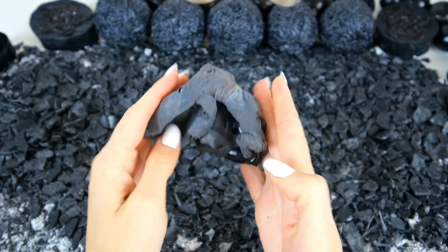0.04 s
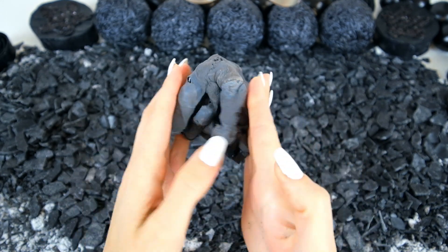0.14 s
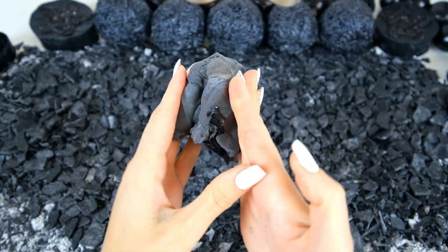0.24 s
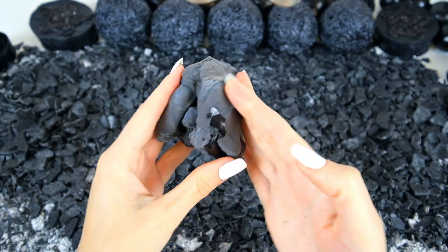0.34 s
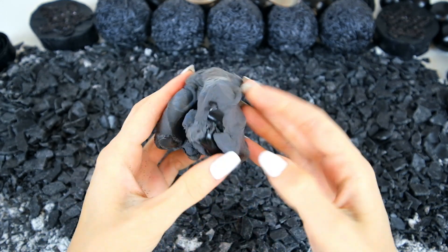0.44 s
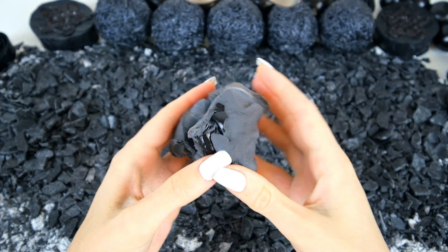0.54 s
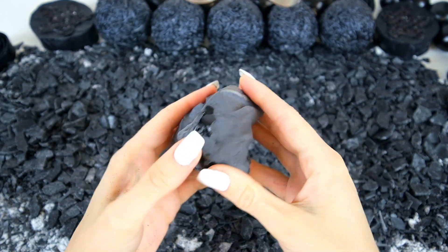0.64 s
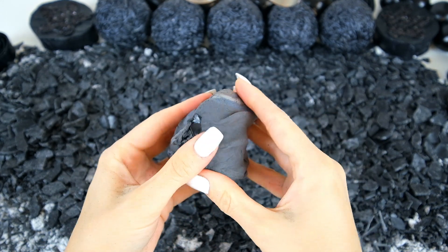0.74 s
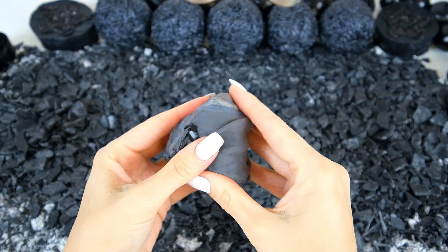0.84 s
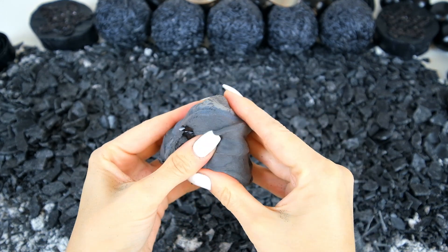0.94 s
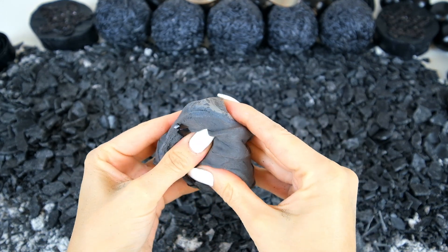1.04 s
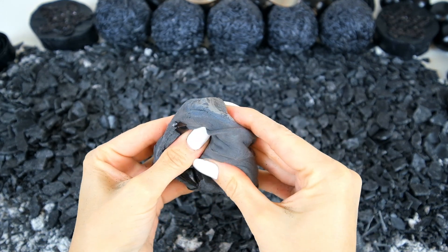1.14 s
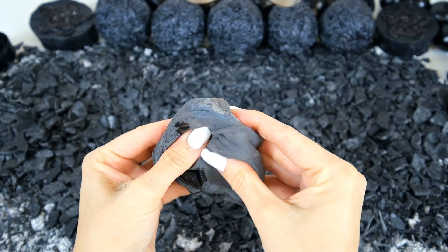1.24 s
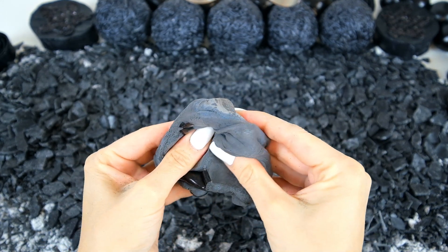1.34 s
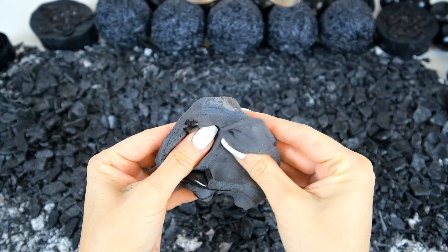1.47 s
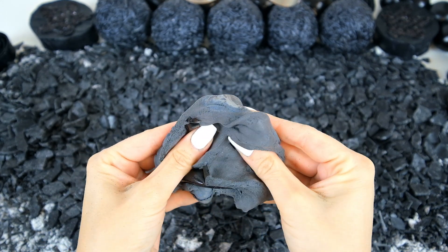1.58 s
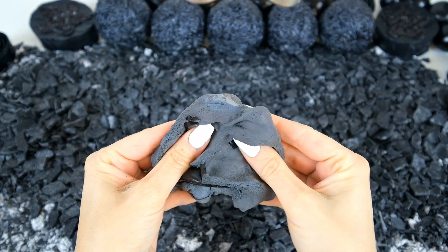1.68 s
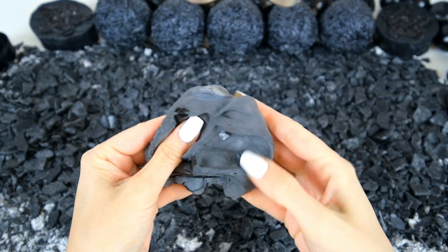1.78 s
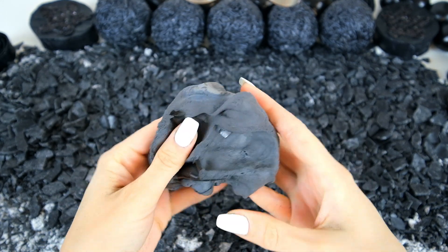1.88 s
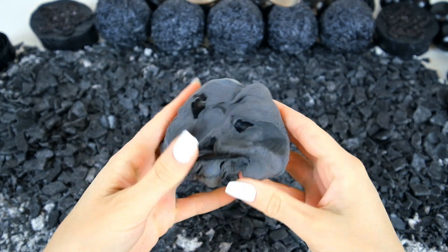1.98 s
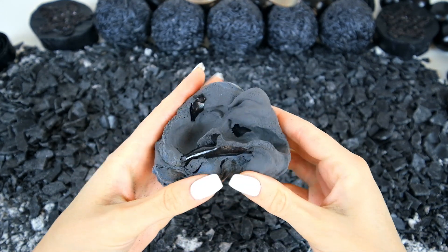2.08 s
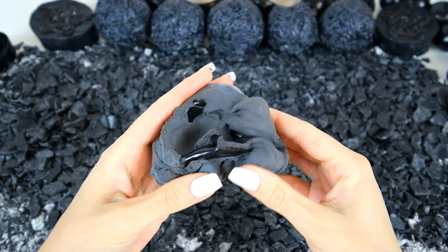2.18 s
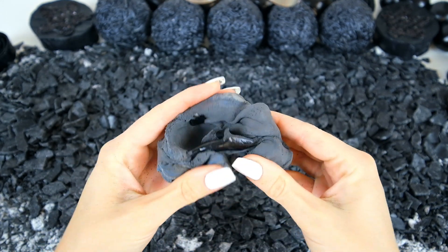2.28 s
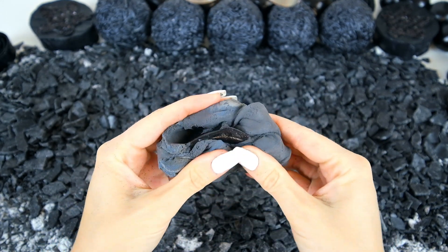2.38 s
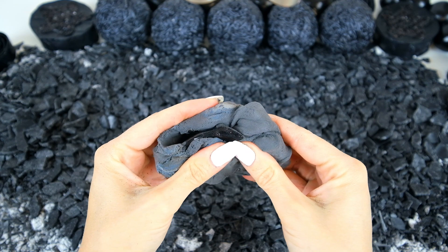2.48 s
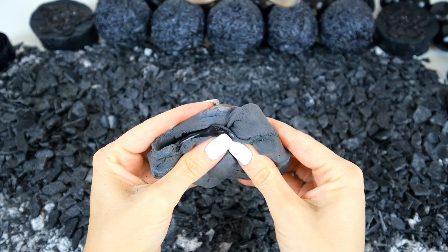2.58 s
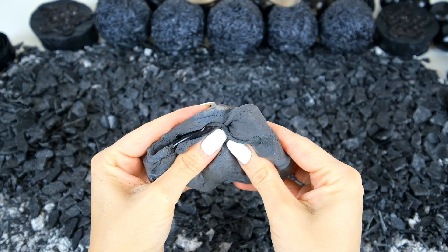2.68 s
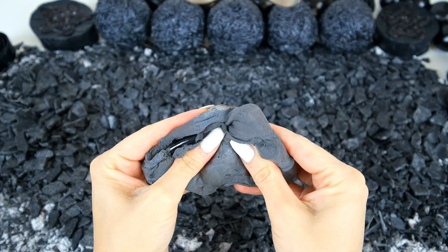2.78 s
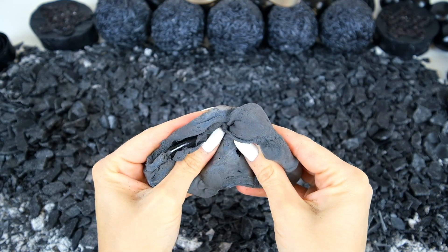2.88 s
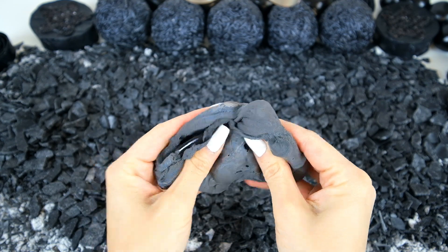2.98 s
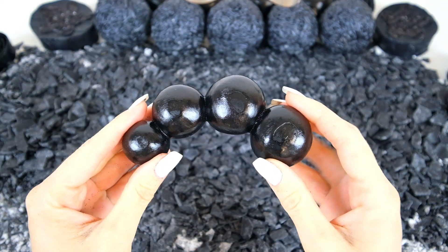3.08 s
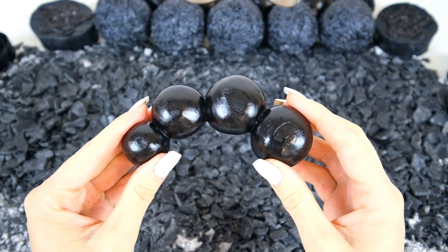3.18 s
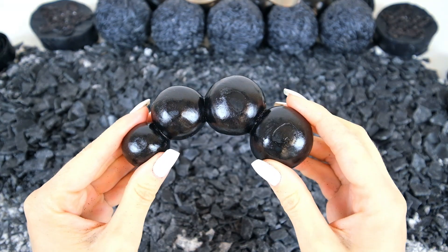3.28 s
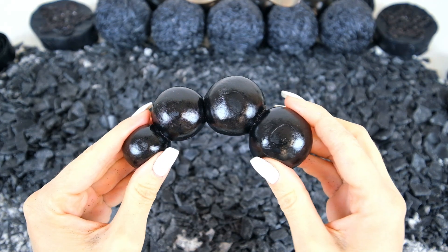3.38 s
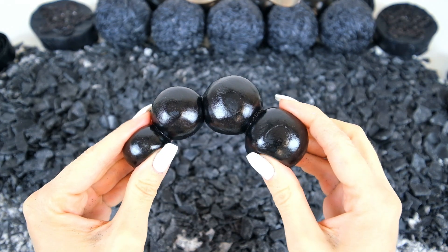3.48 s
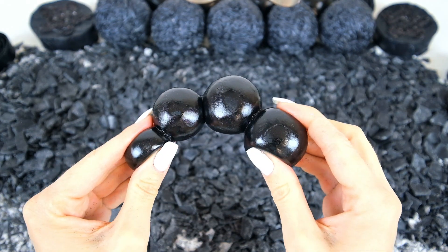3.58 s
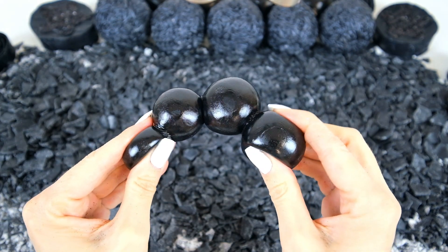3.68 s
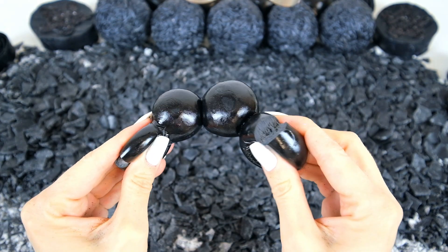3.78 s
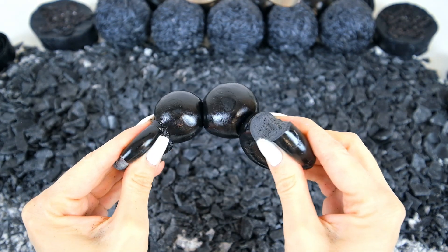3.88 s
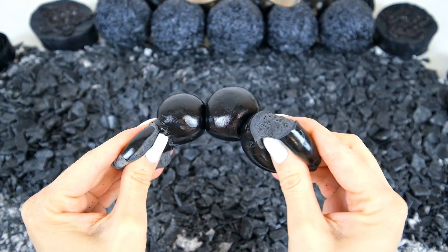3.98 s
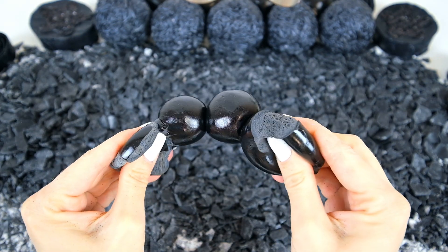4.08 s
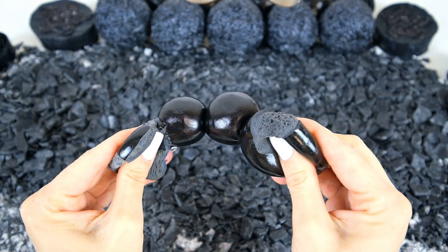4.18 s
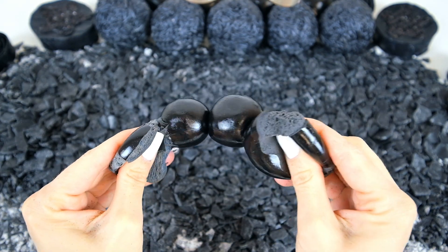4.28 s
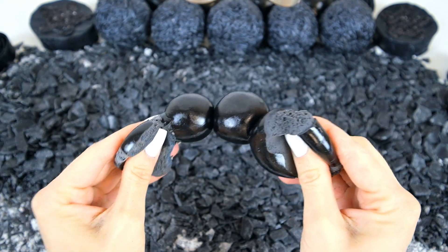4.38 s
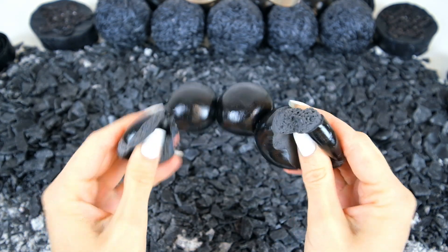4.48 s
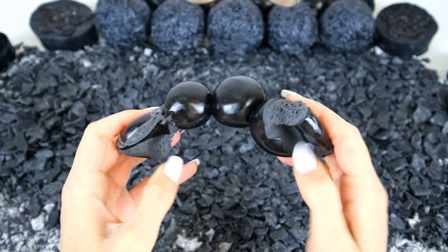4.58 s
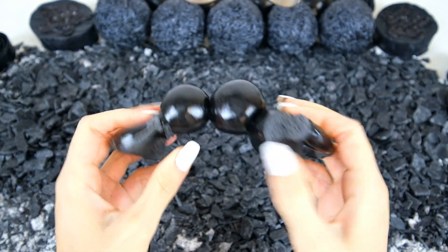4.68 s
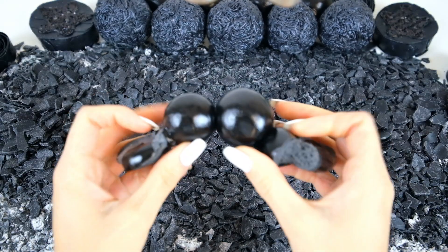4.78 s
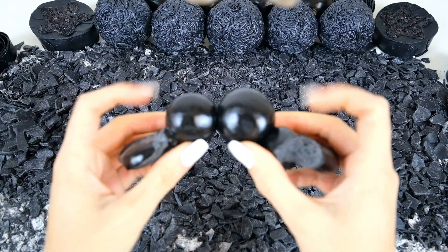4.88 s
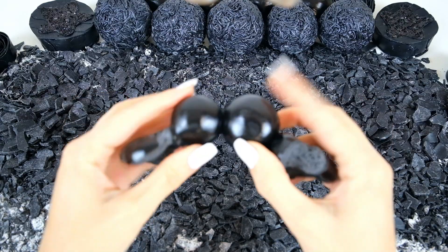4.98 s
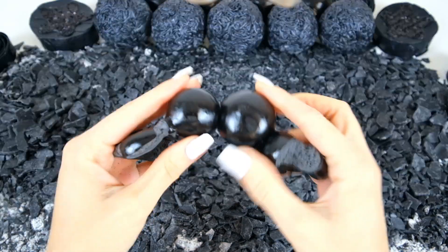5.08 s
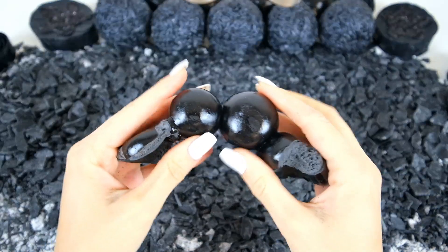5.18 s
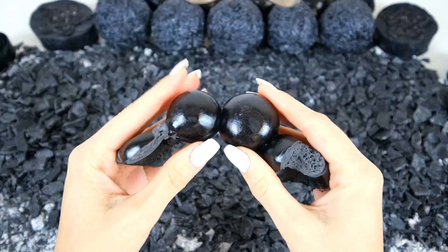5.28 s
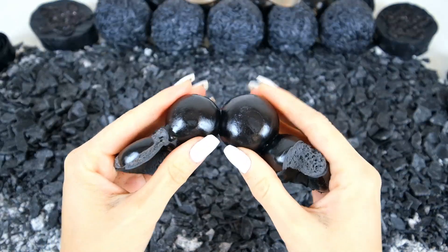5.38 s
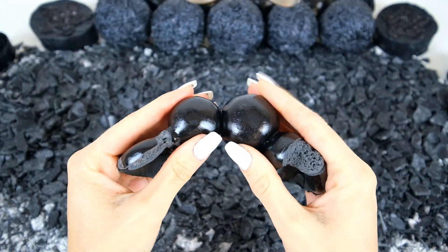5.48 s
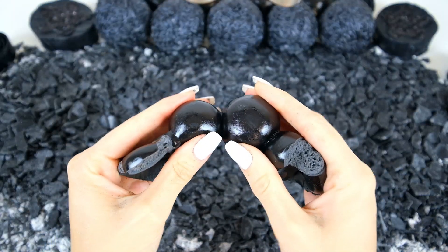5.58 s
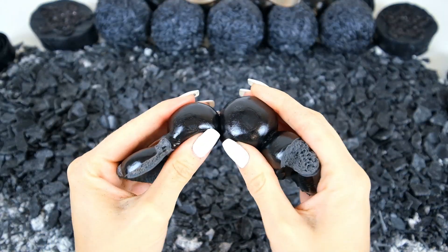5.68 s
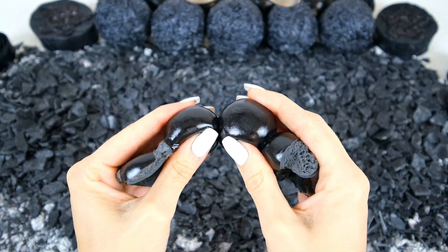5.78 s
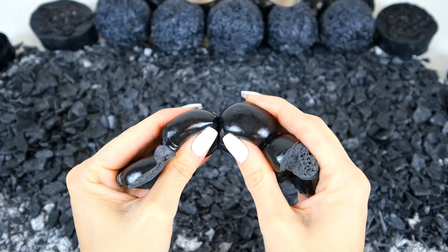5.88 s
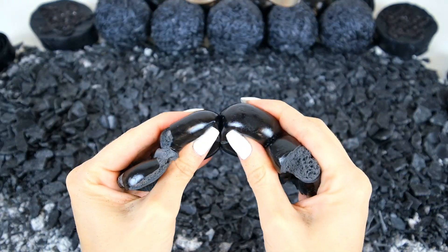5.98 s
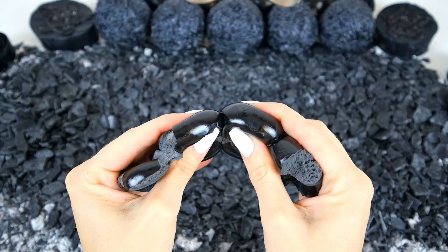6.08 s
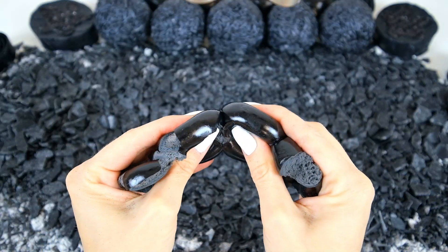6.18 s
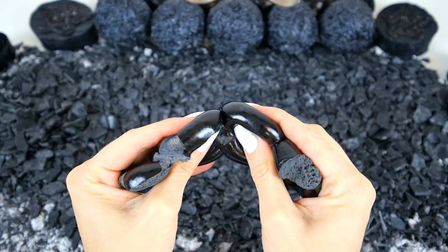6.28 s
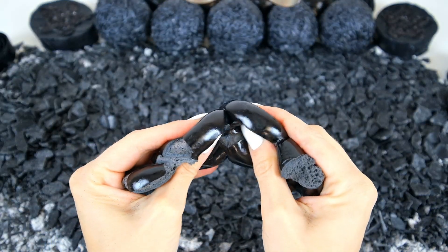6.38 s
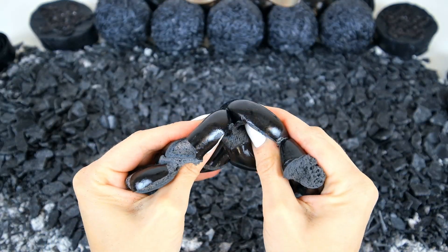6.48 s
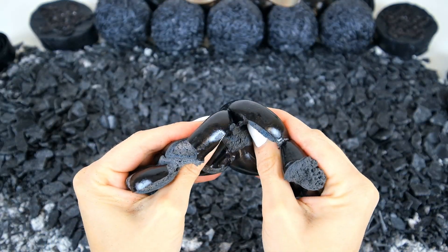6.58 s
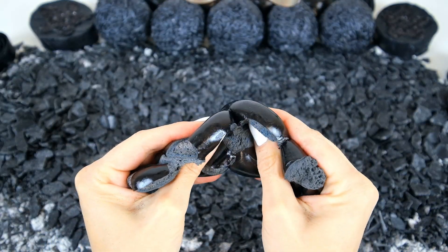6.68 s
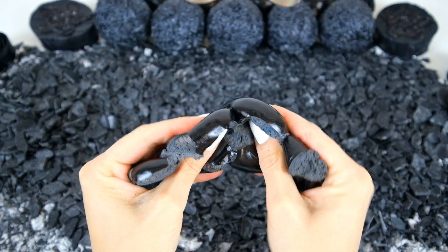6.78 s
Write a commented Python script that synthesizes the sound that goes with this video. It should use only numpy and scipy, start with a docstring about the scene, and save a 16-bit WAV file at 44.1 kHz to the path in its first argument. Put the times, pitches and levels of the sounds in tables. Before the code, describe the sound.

Dry, brittle crunching by hand in a quiet room, heard intimately in wide stereo. Foam clay crackles and fizzes in uneven bursts, with muffled bumps as fingers shift it. Then hard glossy shells are crushed: loud crisp cracks with low pops and brighter fizz, a thumping pause while the grip changes, and a second heavy run of snaps thinning out at the close.

```python
"""Two hands squeeze foam clay with a brittle dried skin, close to a pair of microphones.
From the start the skin snaps in short bursts of noise and the foam under it fizzes in tiny ticks.
The moving hands rub the clay and send low, damped thumps through the table.
From 3.3 s on they crush hollow glazed balls: snaps gain a low swing, the fizz is brighter, rumble joins in.
Shaped noise makes rumble and room hiss throughout; the loudest snaps overload the recorder."""
import sys
import numpy as np
from scipy import signal
from scipy.fft import rfft, irfft
from scipy.io import wavfile
from scipy.ndimage import uniform_filter1d

SR = 44100
rng = np.random.default_rng(int(sys.argv[2]) if len(sys.argv) > 2 else 0)


def pcm_store(signal):
    """Save signal as 16-bit PCM."""
    levels = np.round(np.clip(np.atleast_2d(signal), -1, 1) * 32767)
    wavfile.write(sys.argv[1], SR, levels.astype(np.int16).T)


N = 301644
HOLLOW_S = 3.3  # from here on the hands crush hollow glazed balls

# Thumps from the hands. Each row: peak time in seconds, rough peak level in dB, pitch in Hz.
THUMP_ROWS = [(0.068, -32, 79.0), (0.128, -29.5, 63.6), (0.203, -32, 52), (0.338, -18, 69.6),
              (0.412, -21.5, 77), (0.557, -18, 58.3), (0.593, -19, 70), (0.691, -22.5, 92),
              (0.739, -31, 49.0), (1.116, -33, 165), (1.786, -18.5, 109), (1.814, -22.5, 86.5),
              (1.853, -22, 84), (1.879, -17.5, 100), (1.983, -15, 67), (2.005, -22.5, 100),
              (2.098, -24.5, 76.0), (2.117, -19.5, 72.5), (2.163, -28, 54), (2.195, -22, 94),
              (2.26, -31.5, 53.5), (2.683, -29, 140), (2.808, -38.5, 39.3), (2.87, -42, 39.7),
              (3.026, -28, 146), (3.081, -34.5, 92), (3.168, -24, 71.0), (3.46, -40, 50.3),
              (3.646, -27, 122.0), (3.856, -35, 76), (4.466, -22, 89), (4.514, -9, 105), (4.558, -35, 60.6),
              (4.585, -20.5, 93), (4.652, -25, 68.0), (4.675, -24, 86.0), (4.7, -27, 91.0),
              (4.719, -20, 71), (4.769, -23.5, 54.4), (4.795, -17, 99), (4.86, -33, 111.0),
              (4.913, -28, 70.6), (4.931, -16, 99), (4.956, -15.5, 92.0), (4.994, -10, 82),
              (5.077, -18, 91.5), (5.093, -17, 87.5), (5.168, -20.5, 96.6), (5.391, -17, 89.5),
              (5.473, -24.5, 74), (6.823, -27, 79)]
# Pressure on the foam. Each row: time in seconds, relative fizz level in dB,
# body under 2 kHz in dB relative to the middle band.
SQUEEZE_ROWS = [(0, -43.5, -3), (.23, -52, -21), (.5, -58, -2), (.72, -53, -9.5), (.94, -46, -13.5),
                (1.05, -45.5, -3), (1.22, -45, -8.5), (1.63, -53, -12.5), (1.9, -51.5, -6),
                (2.03, -58, -14), (2.12, -52, -18), (2.29, -44, -46), (2.48, -44.5, -11), (2.66, -45.5, -9),
                (2.69, -37, -1), (2.89, -56.5, -10), (3.08, -50.5, -13), (3.11, -62, -15),
                (3.28, -78.5, -9.5), (3.41, -59.5, -25), (3.53, -54.5, -10), (3.545, -31, -6),
                (3.67, -36, -17), (3.71, -23, -4), (4.07, -41, -8.5), (4.17, -41, -8), (4.33, -53.5, -9.5),
                (4.84, -52, -5), (5.23, -55.5, -15), (5.29, -63.5, -21), (5.46, -56.5, -34),
                (5.645, -51.5, -14.5), (5.67, -38, -3), (5.84, -26.5, -11.5), (6.21, -46.5, -2.5),
                (6.3, -39.5, -13), (6.32, -19.5, -6.5), (6.51, -44, -3), (6.6, -39.5, -5),
                (6.72, -52.5, -15), (6.83, -31.5, -3.5)]


def snaps():
    """Each crack runs in a few uneven jumps, then the freed foam fizzes; later snaps add a low swing."""
    # The clear snaps of the skin. Each row: start in seconds, level in dB,
    # body under 2 kHz and edge over 7 kHz, both in dB relative to the middle band.
    snap_rows = [(0.0569, -16.5, -7.5, 8.5), (0.1406, -27.5, -17, -1.5), (0.593, -22, -3.5, 13.5),
                 (.7661, -28.5, -11, 11), (0.8244, -17.5, -25, -1.5), (.9713, -15, -1, -12),
                 (1.033, -18, 2.5, -4), (1.0467, -7, -6, 0), (1.088, -12, -1, 5.5), (1.1071, -12, -2, -1),
                 (1.1488, -22, -4, -8), (1.1764, -13.5, -7, -6), (1.196, -31.5, -5, -3),
                 (1.2638, -19, -6, -1), (1.3352, -33, -12, -7), (1.3486, -22.5, -15, -0.5),
                 (1.4051, -23.5, -12, 0), (1.4794, -27, -23, -9), (1.5168, -20, 2.5, -1),
                 (1.589, -27.5, -12, 2), (1.7767, -30, 6, -18), (2.3122, -25.5, -20, 0),
                 (2.341, -27.5, -36, -6), (2.4225, -21, -32, -8), (2.4565, -34, -31, 2),
                 (2.5201, -12.5, -9, 2), (2.5614, -18.5, -5, 4), (2.5803, -25, -17, -11),
                 (2.6064, -20.5, -6.5, -3.5), (2.6825, -7.5, -2.5, -2), (2.6957, -24, -16, 5),
                 (2.7508, -17, -10, 7), (2.7615, -24.5, -15, -1), (2.8403, -33, -18, -8),
                 (3.02, -19.5, -2.5, -9), (3.5318, -3, -12.5, 6.5), (3.5971, -9, 3, 12),
                 (3.6179, -12, -5.5, 5.5), (3.6445, -20, -13, -6), (3.6557, -16.5, -8, 6),
                 (3.681, -7.5, 0, 10), (3.696, -2.5, 3, -2), (3.7165, -5.5, 0.5, 4), (3.724, -10.5, -2, 7),
                 (3.7565, -16, 7, 12), (3.7698, -13, 2.5, 10), (3.8158, -3, -1.5, 5), (3.827, -15, -17, -2),
                 (3.8525, -21, 3, -2), (3.857, -19, -8, -4), (3.878, -5.5, 0, 3), (3.9118, -17, -4, 1),
                 (3.93, -8.5, -7, 3.5), (3.9366, -20.5, -2, 0), (3.9669, -19, -10, -4),
                 (3.986, -10.5, -5, 7.5), (4.0277, -20, -9.5, 2), (4.0854, -14.5, -4, 1),
                 (4.0904, -18, 1, 16), (4.121, -22.5, -11, 12), (4.1415, -19.5, -4, 11),
                 (4.157, -15, -7.5, 5), (4.1781, -13.5, 0.5, 6.5), (4.2273, -23, -9.5, 11.5),
                 (4.3084, -31, -15, -10), (4.439, -23, -12, 0), (4.4636, -14.5, -6, -2),
                 (4.5095, -24.5, 20, 9), (4.5811, -22.5, 0, 5.5), (4.67, -23, -3.5, 6.5),
                 (4.6811, -20, -15, 8), (4.712, -26.5, -9, 3), (4.73, -32.5, 5, 12), (4.909, -35, 1, 1),
                 (5.0274, -23, -16, 26), (5.071, -32.5, 7, -10), (5.083, -30, -7.5, -7.5),
                 (5.4687, -33, -34, 31), (5.6596, -5.5, -6.5, -2), (5.728, -4, -8, 1),
                 (5.7826, -10, -3.5, 10), (5.786, -16.5, -15, -5), (5.798, -20.5, 2, 1),
                 (5.8056, -6.5, -12.5, -2.5), (5.8315, -9.5, -7.5, -4), (5.8517, -11.5, -7, 5),
                 (5.8708, -5.5, -10.5, -11), (5.9, -16.5, -15, -7), (5.909, -15, -9, -2),
                 (5.918, -17, -14, 3), (5.9316, -12, -9, -14), (5.9528, -16, -8, 2),
                 (5.9621, -8.5, 5, 12.5), (5.9853, -14, -7, 3.5), (5.9908, -18.5, -6, 9),
                 (6.0144, -22, -1, 9), (6.03, -25, -11, 8), (6.05, -20, -4, 3), (6.058, -26, -7, 1),
                 (6.067, -15.5, -2, 2), (6.078, -25, 1, 6), (6.09, -8.5, -7, 3), (6.11, -21, 7, 21),
                 (6.1203, -30.5, 1, 3), (6.139, -25.5, 3, 9), (6.1639, -21.5, -2, 15), (6.1765, -22, -3, 6),
                 (6.209, -24.5, -6, 0), (6.2294, -15.5, 4, 3), (6.2568, -12, -20, 0),
                 (6.261, -10, -10, -11), (6.2721, -14, -3, 7), (6.2837, -21, 7, 8), (6.3031, -17.5, -10, 6),
                 (6.3113, -3, 10, 13.5), (6.3502, -7.5, -1.5, 0.5), (6.3745, -7.5, -12, -19),
                 (6.4057, -14, -4.5, 5), (6.443, -26.5, -8, 9), (6.5568, -8, -6, 0.5),
                 (6.732, -20, -5.5, 10), (6.7707, -24.5, -3, -3), (6.8206, -20.5, -3, -5)]
    # Tone colour of the breaking skin. Each row: frequency in Hz, relative level in dB per Hz.
    skin_colour = [(120, -37.5), (300, -12.5), (1000, -7.5), (1600, -4), (5000, -6.5), (12500, -16.5),
                   (16000, -23.5)]
    crack_s = 0.0078  # time for a -11 dB crack to fade by 60 dB, before random spread
    longer_per_db, crack_spread_db = 0.58, 4  # stronger cracks run further
    break_db, break_s = 7.5, 0.0019  # the first break stands out: its excess, and its 60 dB fade time

    out = np.zeros((2, N))
    lead = 200  # samples of silence ahead of each crack
    start = slice(lead, lead + 110)  # the first 2.5 ms set the level
    t = np.maximum(np.arange(4096) - lead, 0) / SR
    for s, db, body_db, edge_db in snap_rows:
        a, b, c = rng.standard_normal((3, len(t)))  # c also supplies the chance values below
        fade_s = crack_s * amp(longer_per_db * (db + 11) + crack_spread_db * c[3])
        fade_s = np.clip(fade_s, .002, .06)
        jumps = amp(5 * evened(uniform_filter1d(c, size=10)))
        first_break = amp(break_db - 60 * t / break_s)
        burst = amp(-60 * t / fade_s) * jumps + first_break
        burst /= np.sqrt(np.mean(burst[start] ** 2))
        freed_foam = amp(-25.5 - 60 * t / 0.15)
        shape = np.minimum(t / 0.00018, 1) * (burst + freed_foam)

        # random uneven tone colour, drawn anew for each snap
        uneven_colour = np.transpose([np.linspace(300, 16000, num=20), 3.3 * c[-20:]])
        noise = pair(a * shape, b * shape, lambda hz: read(skin_colour, hz) + read(uneven_colour, hz))
        body, middle, edge = bands(noise, (2000, 7000))
        crack = amp(body_db) * body + middle + amp(edge_db) * edge
        crack /= np.sqrt(np.mean(crack[:, start] ** 2))

        side = amp(0.36 * c[1:3] * np.array([1, -1]))[:, None]  # slight left-right imbalance
        # a brief low pressure swing, growing faster than the crack, of random sign
        swing_shape = (1 - np.exp(-t / 0.00048)) * np.exp(-t / 0.0041)
        low_swing = amp(2.3 * db + 0.5) * swing_shape * np.cos(2 * np.pi * 22.8 * t)
        low_swing *= np.sign(c[0]) * (s > HOLLOW_S)
        add(out, s - lead / SR, side * (amp(db) * crack + low_swing))
    return out


def fizz():
    """Foam cells burst under pressure and rubbing; some ticks span all pitches, others only one range."""
    # Fingers rub the clay, swelling and then letting go. Each row: time of the top in seconds,
    # swell time in seconds, relative level in dB, body under 2 kHz and edge over 7 kHz,
    # both in dB relative to the middle band.
    rub_rows = [(.195, .01, -45, -12, 2), (0.336, 0.034, -38.5, -6.5, -3), (.395, .02, -51, 4, 0),
                (.455, .05, -44, -4, -5.5), (.55, .01, -51, 6, -10), (.885, .02, -41, -18, 1),
                (.935, .01, -44.5, -12, 0), (1.779, 0.07, -34, -8.5, -10), (1.851, 0.034, -33.5, -4, -5),
                (1.879, 0.011, -41.5, 0.5, -16), (1.946, 0.0069, -51, -0.5, -7),
                (1.985, 0.029, -49, -3, -6), (2.09, 0.033, -50.5, -8.5, -13), (2.801, .06, -50.5, -4, 0),
                (3.011, 0.049, -43.5, -2.5, -7), (3.079, 0.15, -42, -8, -3.5),
                (4.511, 0.14, -37, -16.5, -5), (4.55, 0.041, -42, -6, -15), (4.73, 0.067, -37.5, -4, 0.5),
                (4.788, .02, -45, 2, -14), (4.86, .01, -46.5, 3, 5), (4.93, .02, -46, 3, -4),
                (4.988, .04, -42, -2.5, -4), (5.05, .01, -42, -9, 1), (5.09, 0.014, -45.5, -2, -3),
                (5.17, .01, -46, -6, -2), (5.235, .01, -44, -16, -0.5), (5.385, 0.026, -41.5, -16, 4),
                (5.419, 0.0088, -42, -20, 14), (5.56, 0.015, -40, -32, 10.5)]
    # Tone colour of the foam. Each row: frequency in Hz, relative level in dB per Hz.
    foam_colour = [(250, -19.5), (600, -21), (1100, -18), (1900, -13.5), (5000, -11.5), (12800, -7.5),
                   (16000, -14.5)]
    let_go_s = 0.013
    # edge over 7 kHz: base level, rise per dB of effort, and extra for the glazed balls
    bright_db, bright_per_db, glaze_db = 0.5, 0.0861, 1.5

    t = np.arange(N) / SR
    press = amp(curve(SQUEEZE_ROWS, column=1))
    rubs = np.array([amp(db) * np.exp(-((t - s) / np.where(t < s, swell_s, let_go_s)) ** 2)
                     for s, swell_s, db, *_ in rub_rows])
    effort = np.hypot(press, rubs.sum(0))
    effort_db = 20 * np.log10(effort)

    # pressing and rubbing each bring their own share of body and edge
    rub_body, rub_edge = amp(np.transpose(rub_rows)[3:5])
    press_body = amp(curve(SQUEEZE_ROWS, column=2))
    body_gain = np.hypot(press * press_body, rub_body @ rubs) / effort
    press_edge_db = bright_db + bright_per_db * (effort_db + 44.5) + glaze_db * (t > HOLLOW_S)
    edge_gain = np.hypot(press * amp(press_edge_db), rub_edge @ rubs) / effort

    a, b = rng.standard_normal((2, N)) * grain(effort_db)  # ticks across all pitches
    foam = pair(a, b, lambda hz: read(foam_colour, hz))
    body, middle, edge = bands(foam, (2000, 7000))
    # extra ticks in the middle and in the edge alone
    middle = middle * grain(effort_db) ** .7
    edge = edge * edge_gain * grain(effort_db) ** 0.53
    cells = body * body_gain + middle + edge
    return effort * cells / np.sqrt(1 + edge_gain ** 2)  # brighter moments are held back in level


def grain(effort_db):
    """Loudness of bursting cells: sparse ticks over a patchy bed; harder squeezing frees more ticks."""
    ticks_per_s = 250 * amp(0.6 * (effort_db + 47.5))
    size = amp(9.2 * np.minimum(rng.exponential(1, N), 3.2))
    bursts = size * (rng.random(N) < ticks_per_s / SR)
    ticks = signal.lfilter([1], [1, -.93], bursts)  # each tick dies away quickly
    patch_db = np.clip(2.5 + 0.092 * (effort_db + 42.5), 0, 6)
    patches = amp(patch_db * evened(uniform_filter1d(rng.standard_normal(N), size=350)))
    return evened((0.71 + .45 * evened(ticks)) * patches)


def thumps():
    """A soft, heavily damped table swings once or twice: a sharp knock, slower to settle."""
    out = np.zeros((2, N))
    lead = 1000  # samples ahead of the peak
    sides = np.array([[1], [-1]])  # left, right
    for s, db, hz in THUMP_ROWS:
        sign, pan, skew = rng.standard_normal(3)
        turns = (np.arange(3000) - lead) / SR * hz  # time counted in swings
        fade = np.exp(-abs(turns / np.where(turns < 0, .3, .6)) ** 1.09)
        swing = fade * np.cos(2 * np.pi * (turns + 0.017 + 0.017 * skew * sides))
        swing -= fade * swing.sum(1, keepdims=True) / fade.sum()  # the table returns to rest
        swing = uniform_filter1d(swing, size=20)  # soft hands round the knock
        level = np.sign(sign) * amp(db + 3.0 * pan * sides)
        add(out, s - lead / SR, level * swing)
    return out


def rumble():
    """Small restless pushes gather around the thumps and under the crushing of the hard balls."""
    # Tone colour of the rumble. Each row: frequency in Hz, relative level in dB per Hz.
    rumble_colour = [(20, 11), (60, 3), (110, -20), (200, -16.5), (450, -22), (800, -56)]
    still_db = -67  # level at rest
    stir_db, stir_s = -16, 0.036  # around each thump: level relative to it, and for how long
    strain_db = -4  # under the squeeze, relative to the fizz setting

    a, b = rng.standard_normal((2, N))
    t = np.arange(N) / SR
    coarse_t = np.arange(0, N, 100) / SR  # the slow stir needs only every 100th sample
    stir_power = sum(amp(db + stir_db) ** 2 * np.exp(-((coarse_t - s) / stir_s) ** 2)
                     for s, db, hz in THUMP_ROWS)
    strain = amp(curve(SQUEEZE_ROWS, column=1) + strain_db) * (t > HOLLOW_S)
    level = np.sqrt(amp(still_db) ** 2 + np.interp(t, coarse_t, stir_power) + strain ** 2)
    return level * evened(pair(a, b, lambda hz: read(rumble_colour, hz)))


def hiss():
    """Steady noise of room and microphones: random noise with a fixed tone colour."""
    # Tone colour of the hiss. Each row: frequency in Hz, relative level in dB per Hz.
    hiss_colour = [(120, -17), (200, -1.5), (448, -2.5), (500, -15), (1400, -24.5), (2290, -27),
                   (2910, -42.5), (16000, 1.5)]
    hiss_db = -85.5
    a, b = rng.standard_normal((2, N))
    return amp(hiss_db) * evened(pair(a, b, lambda hz: read(hiss_colour, hz)))


def pair(a, b, colour_db):
    """Colours two noises and blends them into what two spaced microphones hear."""
    # How alike left and right are. Each row: frequency in Hz, likeness from 0 to 1.
    likeness = [(60, 0.6), (1400, 1), (3100, 0.93), (7000, 0.13), (15000, 0.13)]
    lead_s = 5e-5  # sound reaches the left microphone first
    hz = np.fft.rfftfreq(len(a), 1 / SR)
    same = np.clip(read(likeness, hz), 0, 1)
    left = rfft(a)
    right = same * left + np.sqrt(1 - same ** 2) * rfft(b)
    right = right * np.exp(-2j * np.pi * hz * lead_s)  # a later arrival
    return irfft(np.array([left, right]) * amp(colour_db(hz)), len(a))


def bands(x, edges_hz):
    """Splits a sound at the edges into bands of equal strength."""
    hz = np.fft.rfftfreq(x.shape[1], 1 / SR)
    spectrum = rfft(x)
    over = [1] + [shelf(hz, edge) for edge in edges_hz] + [0]
    return [evened(irfft(spectrum * (lower - upper), x.shape[1]))
            for lower, upper in zip(over, over[1:])]


def shelf(hz, edge_hz):
    """Goes smoothly from 0 under the edge to 1 over it."""
    return 1 / (1 + (edge_hz / (hz + 1)) ** 7)


def amp(db):
    """Turns decibels into a plain multiplier."""
    return 10 ** (np.asarray(db) / 20)


def evened(x):
    """Scales a signal to an average (RMS) strength of 1."""
    return x / np.sqrt(np.mean(x ** 2) + 1e-20)


def read(points, hz):
    """Reads a value between table points, on a logarithmic pitch scale."""
    f, value = np.transpose(points)
    return np.interp(np.log(hz + 1), np.log(f + 1), value)


def curve(rows, column):
    """Draws straight lines through one column over time."""
    columns = np.transpose(rows)
    return np.interp(np.arange(N) / SR, columns[0], columns[column])


def add(mix, s, sound):
    """Adds a stereo sound to the mix from s seconds on, cut off at the end."""
    at = max(round(s * SR), 0)
    part = mix[:, at:at + sound.shape[1]]
    part += sound[:, :part.shape[1]]


def scene():
    """All layers sound together."""
    return snaps() + fizz() + thumps() + rumble() + hiss()


def record(dry):
    """Overload clips the peaks hard just under full scale, then a low-pass removes the top treble."""
    clipped = np.clip(dry, -.97, .97)
    edge_hz = 16400
    lowpass = signal.firwin(255, edge_hz, window=("kaiser", 9), fs=SR)
    return signal.oaconvolve(clipped, lowpass[None], "same")


dry = scene()
out = record(dry)
pcm_store(out)
```